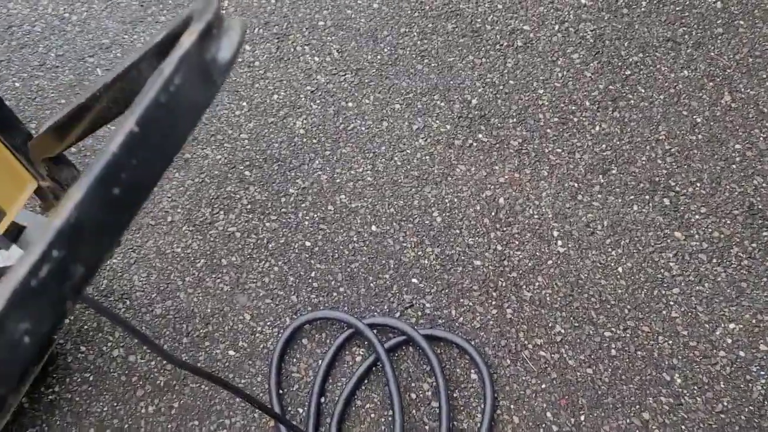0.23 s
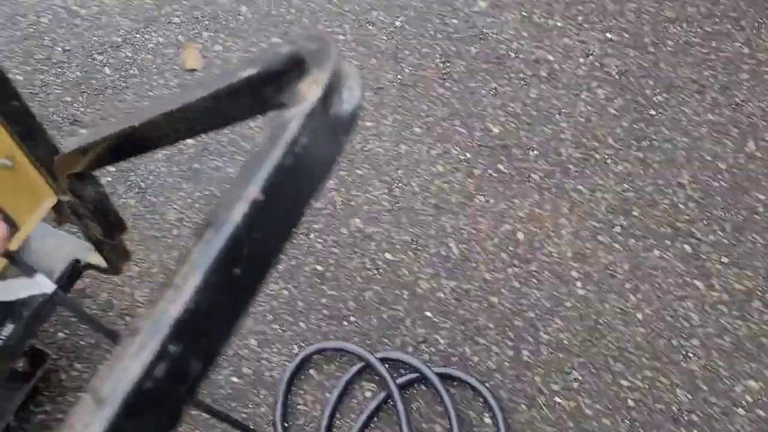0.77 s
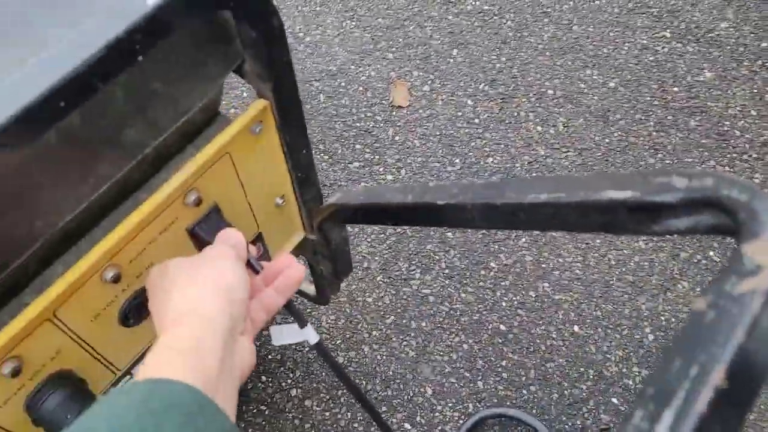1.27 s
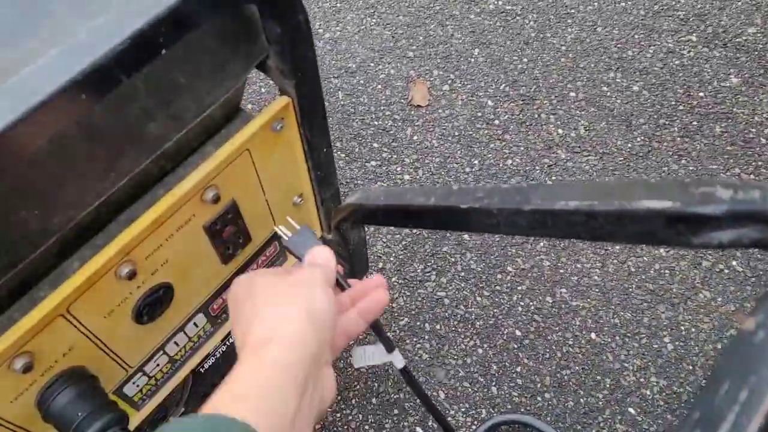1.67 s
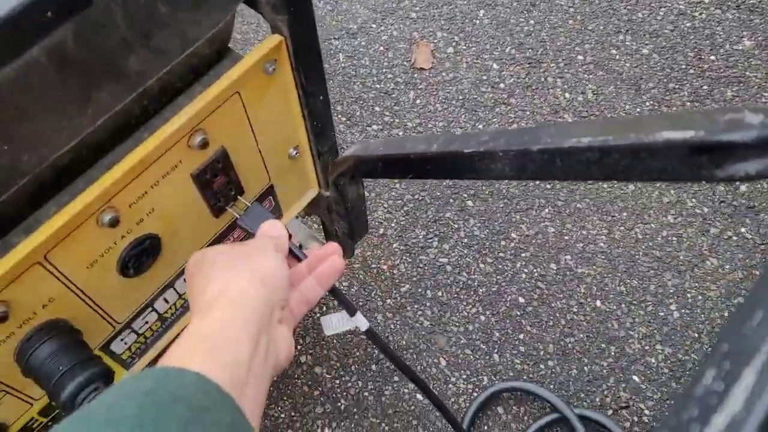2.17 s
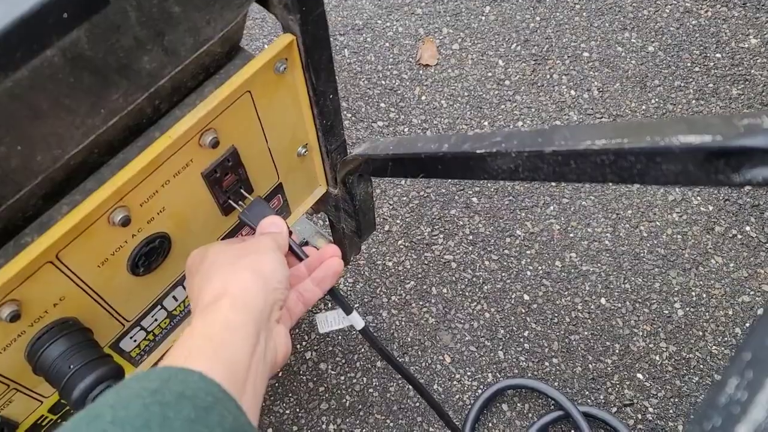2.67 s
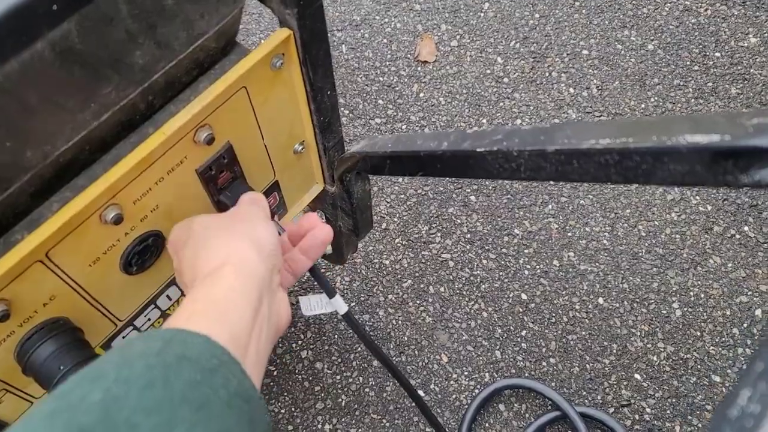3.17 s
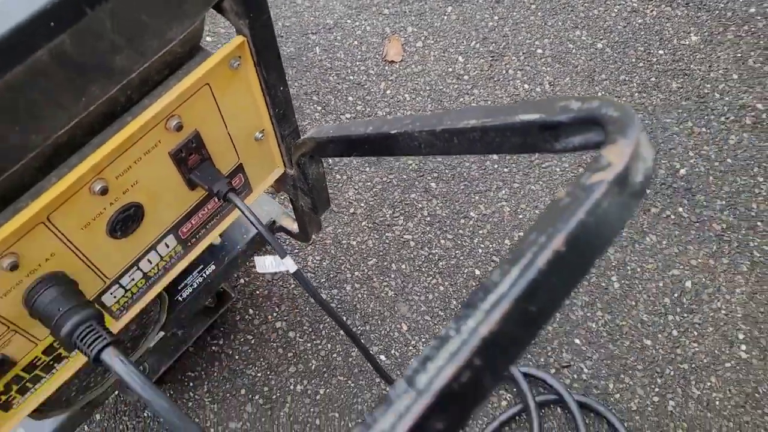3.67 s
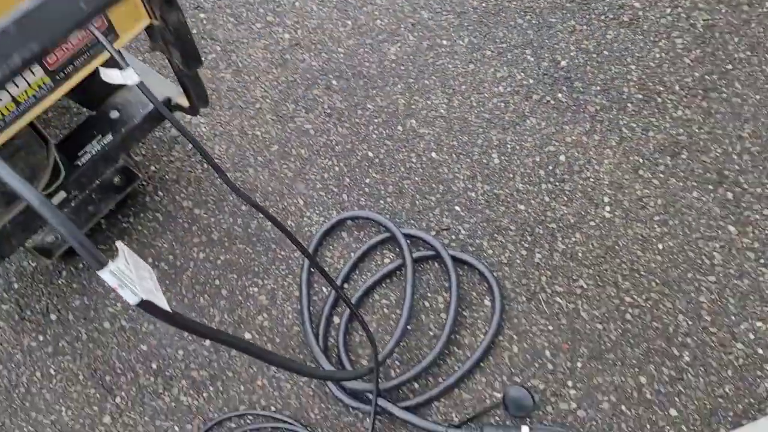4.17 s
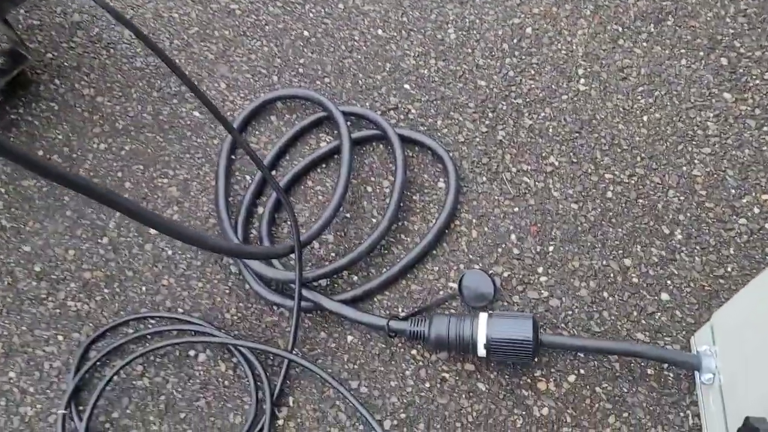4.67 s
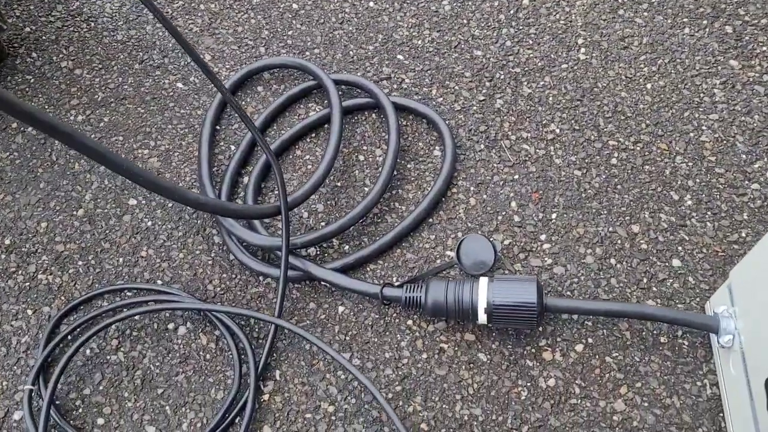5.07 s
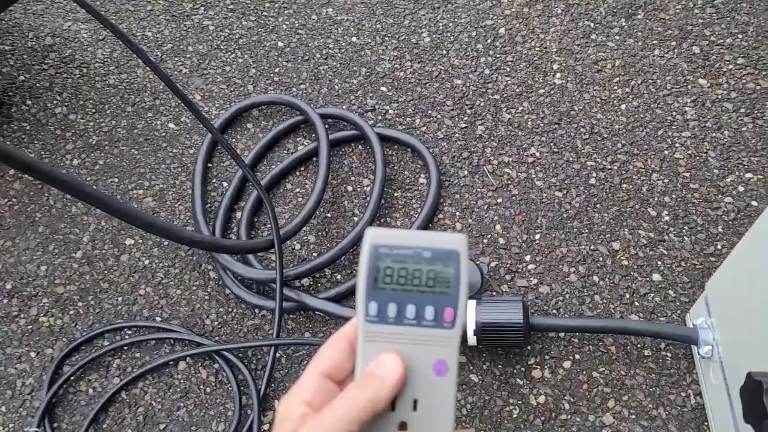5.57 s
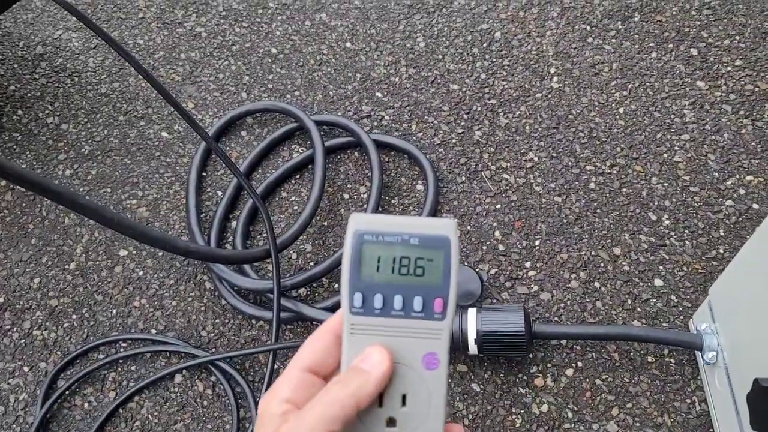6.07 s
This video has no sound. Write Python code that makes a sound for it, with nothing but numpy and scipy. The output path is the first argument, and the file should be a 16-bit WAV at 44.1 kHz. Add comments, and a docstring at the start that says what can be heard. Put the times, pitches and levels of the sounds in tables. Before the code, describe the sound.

Continuous portable generator engine at constant speed, rough deep hum with fast fluttering pulses, airy hiss and tinny housing ring, shifting slightly as the microphone moves.

```python
"""Generator at steady speed

A single-cylinder four-stroke generator drones outdoors: one exhaust pulse every two turns, the shaking piston
and the cooling fan's blades give a comb of phase-locked orders. Cooling air and rattle rush above it as bands
of noise, and the sheet-metal housing rings as narrow resonances; both swell with the engine. A hand-held two-
port microphone leans in to the panel, then turns away, crossfading levels and phases."""
import sys
import numpy as np
from scipy import signal
from scipy.fft import next_fast_len
from scipy.io import wavfile

SR = 44100
rng = np.random.default_rng(int(sys.argv[2]) if len(sys.argv) > 2 else 0)


def file_out(sig):
    """Save sig as 16-bit WAV at sys.argv[1]."""
    # one column per channel
    cols = np.atleast_2d(sig).T
    # limit, then scale
    lim = np.clip(cols, -1, 1)
    pcm = np.round(lim * 32767).astype(np.int16)
    wavfile.write(sys.argv[1], SR, pcm)


N = 278271
STEP = 8   # samples per control value

# "Six levels" below: left, right at the panel; left, right half back; left, right turned away.
# Engine speed: t/s, firing rate/Hz
FIRING_RATE = [(0.0, 30.254), (0.53, 30.661), (1.17, 30.597), (1.43, 30.328), (1.63, 30.626),
               (2.63, 30.517), (2.83, 30.336), (2.96, 30.659), (3.65, 30.468), (4.66, 30.62),
               (4.78, 30.242), (5.41, 30.78), (5.54, 30.453), (6.31, 30.463)]
FIRST_ANGLE = .542   # share of the firing cycle already past at the start
# Microphone stance: t/s, place (0 at the panel, 1 half back, 2 turned away)
MIC_PLACE = [(0, 1.04), (.6, 1.02), (1.35, .05), (3.4, 0.056), (4.2, 0.82), (4.5, 1.12), (4.8, 1.97),
             (6.31, 1.75)]
# Engine orders before their waver: multiple of the firing rate, six levels/dB rms
ENGINE_ORDERS = [(1, -39, -33, -53, -36, -44, -38), (2, -18, -17, -20, -20, -23, -21.5),
                 (3, -27, -31.5, -26.5, -30.5, -29, -30.5), (4, -31, -26, -38, -28, -35, -41),
                 (5.013, -19, -17.5, -17.5, -16.5, -17, -16.5), (6, -35.5, -30.5, -42, -26, -28, -26),
                 (7, -35, -36, -35, -33.5, -36, -29.5), (8, -39, -30.5, -27.5, -27.5, -27, -24.5),
                 (9, -33.5, -29, -46, -38.5, -28.5, -40.5), (10, -40, -30.5, -33, -37.5, -32, -31.5),
                 (11.02, -34.5, -38.5, -40, -32, -28.5, -26), (12, -58, -48, -37, -37.5, -35, -49),
                 (13, -28.5, -36, -39, -44, -55, -49), (14, -42, -37, -41.5, -29.5, -34, -67),
                 (15, -33.5, -34.5, -40, -55, -38.5, -39), (16.03, -28.5, -33.5, -30, -36, -51, -32),
                 (17, -34, -40, -53, -50, -57, -47), (18, -34.5, -30, -29, -36.5, -55, -63),
                 (19, -42, -36.5, -45, -33, -45, -44), (20, -33.5, -30, -38, -31.5, -54, -47),
                 (21, -48, -35, -32.5, -33, -60, -37), (22, -57, -44, -55, -34.5, -45, -60),
                 (22.83, -48, -41, -38, -37, -54, -36.5), (24, -48, -32.5, -31.5, -29.5, -33.5, -32),
                 (25, -61, -50, -49, -41, -54, -51), (26, -56, -39, -35, -35, -34, -38),
                 (27, -59, -47, -60, -50, -34.5, -51), (28, -66, -56, -49, -53, -62, -52),
                 (29, -46, -35, -49, -44, -50, -49), (30, -43, -47, -32.5, -43, -41, -50),
                 (31, -44, -54, -37, -36.5, -47, -45), (39, -54, -47, -47, -48, -48, -44),
                 (40, -30.5, -31.5, -29, -27, -31, -35), (41, -36, -43, -42, -53, -49, -60),
                 (52, -39, -44, -48, -31.5, -45, -54)]
# Orders driven by the piston's inertia, not by the exhaust: multiple of the firing rate
SHAKE_ORDERS = (2, 4, 8)
# Orders radiated by the muffler shell, about a quarter period late: multiple of the firing rate
SHELL_ORDERS = (1, 7, 10, 11, 12)
EXHAUST_RAD, SHAKE_RAD, SHELL_RAD = -.2, 2.0, -1.7   # start phases
# Turned away, orders from this one up come late (in firing cycles) with a phase of their own
ECHO_FROM, ECHO_CYCLES, ECHO_RAD = 6, .086, 2.0
# Air rush and rattle before swell and trim: f/Hz, six levels/dB per Hz
RUSH_SPECTRUM = [(45, -55, -58, -60, -59, -59, -56), (202, -53, -62, -71, -52, -59, -53),
                 (345, -54, -53.5, -51.5, -65, -57, -53.5), (500, -58.5, -56, -58, -58, -55, -55),
                 (900, -56.5, -55.5, -57, -54.5, -53.5, -54.5),
                 (1363, -56.5, -50.5, -52.5, -51, -50.5, -50), (1580, -56.5, -57, -54, -54, -59, -46),
                 (2055, -69, -66, -66, -60, -57.5, -54), (2840, -65.5, -64, -65.5, -64, -61.5, -62),
                 (4650, -69.5, -64.5, -66, -62, -62.5, -59), (6100, -62, -58.5, -62, -60, -59.5, -60.5),
                 (7600, -62.5, -61, -61.5, -60.5, -59.5, -61), (10000, -70.5, -66.5, -68, -66, -64, -64),
                 (15500, -72.5, -67, -70.5, -67, -65.5, -64.5)]
# Noisy puff at each firing: f/Hz, peak level over the rush/dB up to half back, the same turned away
FIRING_PUFF = [(150, 2.5, 2.5), (300, 2.5, 2.6), (450, -0.5, 1.1), (790, 2, 1.5), (1100, -6, .5),
               (2000, -0.5, .1)]
# Treble level, scaled down in the lower bands: t/s, level/dB
TREBLE_LEVEL = [(0, 0), (2.2, 0), (3.3, -0.5), (4.4, 1.7), (5.0, 0), (6.31, -.4)]
# Trim of rush and housing at the panel, half back, turned away: level/dB
RUSH_TRIM = (1, 1.33, -0.2)
# Sheet-metal resonances before swell and trim: f/Hz, width/Hz, six levels/dB rms
HOUSING_MODES = [(490, 25, -38, -38, -47, -45, -33.5, -39), (628, 53, -58, -31.5, -61, -46, -42, -43),
                 (794, 26, -61, -36, -41, -39, -38, -34), (1243, 75, -30, -29, -32.5, -29.5, -35, -30.5),
                 (1336, 80, -53, -35.5, -44, -36, -38, -32.5), (1600, 41, -34.5, -33.5, -46, -38, -37, -35),
                 (1726, 33, -55, -46, -56, -38, -52, -42), (2403, 30, -40, -50, -37.5, -55, -38, -57)]
# Noise power that both ports hear alike: f/Hz, share (0-1)
SHARED_NOISE = [(60, 0.6), (350, 0.4), (550, 0.55), (800, 0.75), (1400, 0.97), (2000, 0.17), (3000, 0.15),
                (5000, 0.02), (9000, 0.02)]
# Phase lead of the left port at the panel, half back, turned away: slope/rad per rad
PORT_LEAD = (1.29, 1.53, 1.89)
PORT_CORNER_HZ, PORT_STEEPNESS = 460, 1.84
CAPSULE_HZ = 13   # the two capsules' bass cuts differ by this much
# Blind spot of the ports: f/Hz, width/Hz, level/dB
MIC_DIP = (8674, 1420, -26)
CUTOFF_HZ = 15750


def engine_orders(angle, place, lead):
    """Phase-locked orders form the exhaust pulse, the piston shake and the fan's blade tone, heard along two
    paths."""
    out = np.zeros((2, N))
    cycle = angle[::STEP] / (2 * np.pi)
    # every firing has its own strength and timing
    chance = rng.standard_normal((int(cycle[-1]) + 2, 2))
    strength, timing = (np.interp(cycle, np.arange(len(c)), c) for c in chance.T)
    for multiple, *six_db in ENGINE_ORDERS:
        k = round(multiple)
        start = EXHAUST_RAD
        if k in SHAKE_ORDERS:
            start = SHAKE_RAD
        elif k in SHELL_ORDERS:
            start = SHELL_RAD
        turned_away = ECHO_RAD - 2 * np.pi * k * ECHO_CYCLES if k >= ECHO_FROM else start
        phases = np.repeat([start, start, turned_away], 2)
        heard = by_place(from_db(six_db) * np.exp(1j * phases), place)

        uneven = np.clip((k - 4) / 12, .1, 1)     # the sharp part of the pulse varies most
        waver_db = uneven * (0.46 * strength + 0.98 * drift(3.1))
        waver_rad = uneven * (0.3 * timing + 0.31 * drift(3.3))
        waver = from_db(waver_db) * np.exp(1j * waver_rad)
        ports = np.exp(1j * port_lead(k * FIRING_RATE[0][1], lead) * [[1], [0]])
        phasor = np.sqrt(2) * heard * waver * ports     # rms to peak
        out += (held(phasor) * np.exp(1j * k * angle)).real
    return out


def air_rush(angle, place, lead):
    """Cooling air and rattle: third-octave noise that swells through the firing cycle and puffs at each firing."""
    white = [port_noise(), port_noise()]       # neighbouring bands get unrelated noise
    turn = angle[::STEP]
    treble_db, = in_time(TREBLE_LEVEL)
    shared_db = engine_throb(turn) + .5 * drift(3.5) + 0.33 * drift(3.6)
    firing = np.exp(7.0 * (np.cos(turn) - 1))     # a few milliseconds around each exhaust pulse
    out = np.zeros((2, N))
    edges = 40 * 2 ** (np.arange(27) / 3)
    for k, (low, high) in enumerate(zip(edges, edges[1:])):
        hz = np.sqrt(low * high)
        sos = signal.butter(2, [low, high], "band", fs=SR, output="sos")
        band = two_ports(sos, white[k % 2], hz, lead)
        together = np.clip(hz / 4000, .3, 1)      # the treble rattles most in step with the engine
        puff_near_db, puff_far_db = at_hz(FIRING_PUFF, hz)
        puff_db = puff_near_db + (puff_far_db - puff_near_db) * np.clip(place - 1, 0, 1)
        level_db = by_place(at_hz(RUSH_SPECTRUM, hz), place) + together * (shared_db + treble_db)
        level_db = level_db + puff_db * firing + 1.1 * drift(10.7)
        out += np.sqrt(high - low) * held(from_db(level_db)) * band
    return out


def housing(angle, place, lead):
    """Sheet metal rings: narrow two-pole resonances driven by noise, swelling with the engine."""
    out, white = np.zeros((2, N)), port_noise()
    throb_db = engine_throb(angle[::STEP])
    for hz, width, *six_db in HOUSING_MODES:
        r = np.exp(-np.pi * width / SR)
        # the zeros shape the skirts, the pole pair rings
        sos = [[1, 0.047, -1.136, 1, -2 * r * np.cos(2 * np.pi * hz / SR), r * r]]
        ringing = two_ports(sos, white, hz, lead)
        level_db = by_place(six_db, place) + throb_db + .7 * drift(8)
        out += held(from_db(level_db)) * ringing
    return out


def engine_throb(turn):
    """Swell in dB, made of the first three harmonics of the firing cycle."""
    return 1.07 * np.cos(turn - 1.0) + 0.22 * np.cos(2 * turn - 1.3) + 0.66 * np.cos(3 * turn - .8)


def port_noise():
    """White noise in four rows: shared, shared a quarter period shifted, left's own, right's own."""
    white = rng.standard_normal((4, N))
    white[1] = signal.hilbert(white[0], next_fast_len(N))[:N].imag
    return white


def two_ports(sos, white, hz, lead):
    """One band of noise at both ports: a shared part, phase-shifted, and a part of each port's own."""
    shared, quarter, *own = signal.sosfilt(sos, white)
    alike = np.clip(at_hz(SHARED_NOISE, hz)[0], 0, 1)
    shift = port_lead(hz, lead)
    left = held(np.cos(shift)) * shared - held(np.sin(shift)) * quarter
    both = np.array([left, shared])
    return (np.sqrt(alike) * both + np.sqrt(1 - alike) * np.array(own)) / shared.std()


def port_lead(hz, lead):
    """The left port faces the engine; its path's phase lead grows with pitch and levels off."""
    return np.arctan(CAPSULE_HZ / hz) + lead * np.arctan((hz / PORT_CORNER_HZ) ** PORT_STEEPNESS)


def by_place(values, place):
    """Left and right value between the three places of the microphone."""
    return np.array([np.interp(place, (0, 1, 2), side) for side in np.reshape(values, (3, 2)).T])


def drift(rate):
    """Slow chance of spread 1 as a control: noise through a double one-pole low-pass at rate Hz, run in."""
    r = np.exp(-2 * np.pi * rate * STEP / SR)
    noise = rng.standard_normal(len(range(0, N, STEP)) + 5000)
    slow = signal.lfilter([1], [1, -2 * r, r * r], noise)[5000:]
    return slow / slow.std()


def from_db(db):
    """Gain of a level."""
    return 10 ** (np.asarray(db) / 20)


def in_time(rows):
    """Columns of a curve, one value a control step."""
    s, *columns = np.transpose(rows)
    return [np.interp(np.arange(0, N, STEP) / SR, s, c) for c in columns]


def at_hz(points, hz):
    """All columns of a spectrum at one frequency, read on a log scale."""
    f, *columns = np.transpose(points)
    return [np.interp(np.log(hz), np.log(f), c) for c in columns]


def held(control):
    """A control, one value a sample."""
    return np.repeat(control, STEP, axis=-1)[..., :N]


def scene():
    """Engine orders, rush and housing as the moving microphone meets them."""
    place, = in_time(MIC_PLACE)
    lead = np.interp(place, (0, 1, 2), PORT_LEAD)
    trim_db = np.interp(place, (0, 1, 2), RUSH_TRIM)
    firing_rate, = in_time(FIRING_RATE)
    angle = 2 * np.pi * (FIRST_ANGLE + np.cumsum(held(firing_rate)) / SR)   # 2 pi a firing cycle
    noise = air_rush(angle, place, lead) + housing(angle, place, lead)
    return engine_orders(angle, place, lead) + held(from_db(trim_db)) * noise


def record(dry):
    """The microphone dips in the treble, peaks are rounded, the top is cut."""
    hz, width, dip_db = MIC_DIP
    w, g = 2 * np.pi * hz / SR, from_db(dip_db / 2)
    a = np.sin(w) * width / hz / 2
    zeros = [1 + a * g, -2 * np.cos(w), 1 - a * g]
    poles = [1 + a / g, -2 * np.cos(w), 1 - a / g]
    dipped = signal.lfilter(zeros, poles, dry)
    rounded = 1.369 * np.tanh(dipped / 1.236)
    top_cut = signal.ellip(12, .5, 70, CUTOFF_HZ, fs=SR, output="sos")
    return signal.sosfilt(top_cut, rounded)


dry = scene()
out = record(dry)
file_out(out)
```